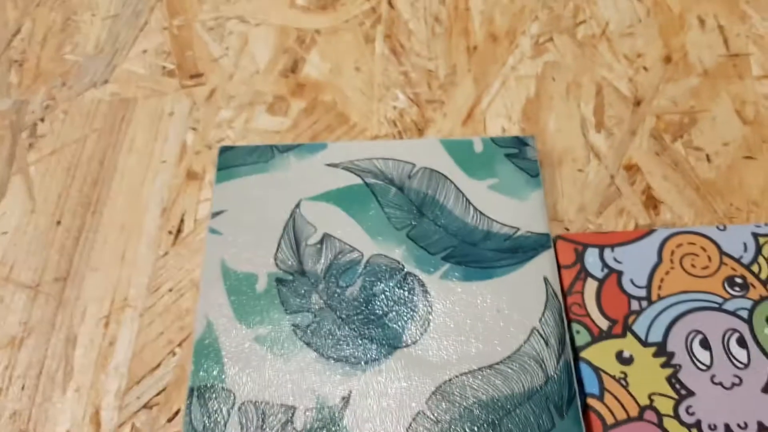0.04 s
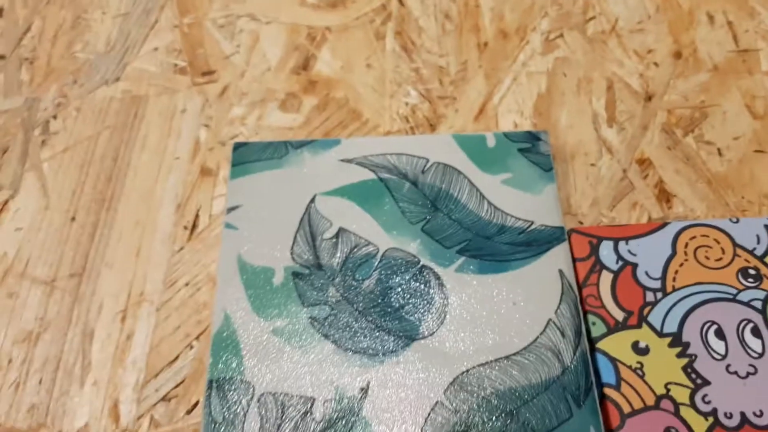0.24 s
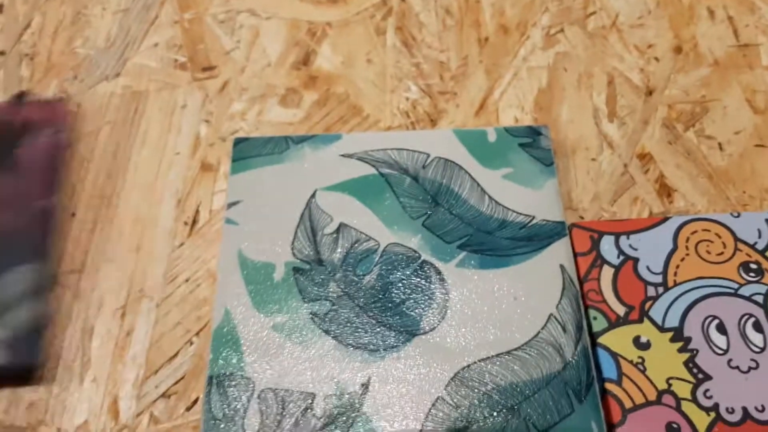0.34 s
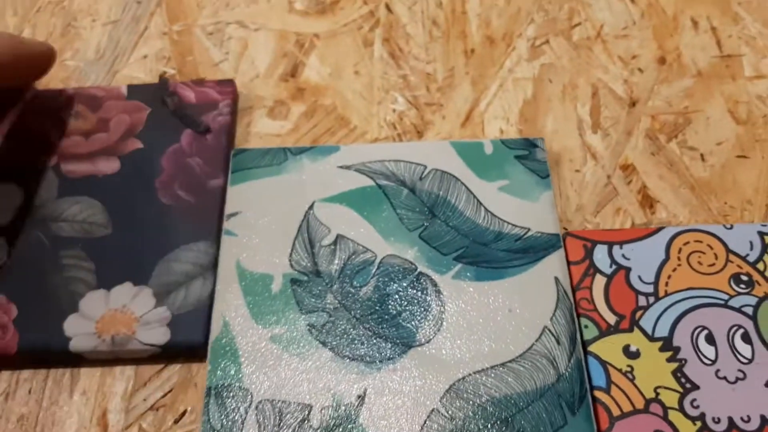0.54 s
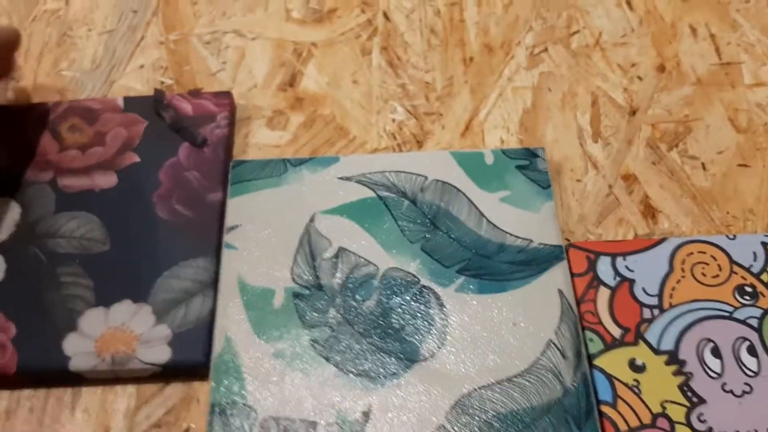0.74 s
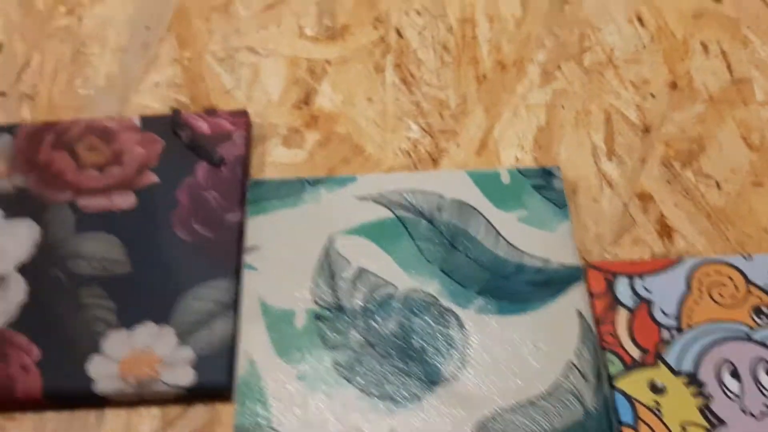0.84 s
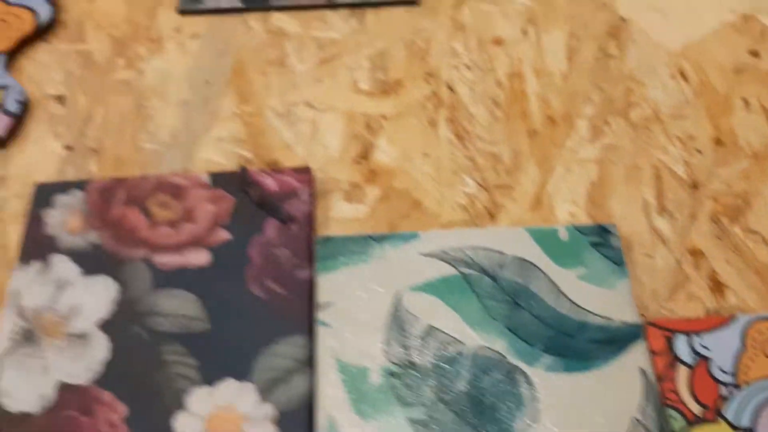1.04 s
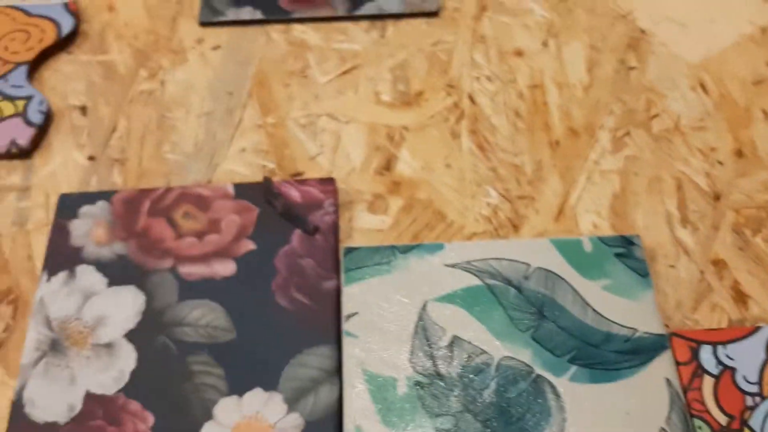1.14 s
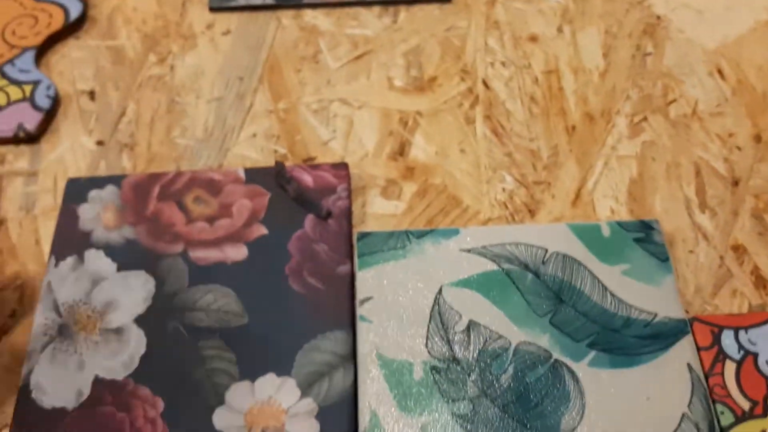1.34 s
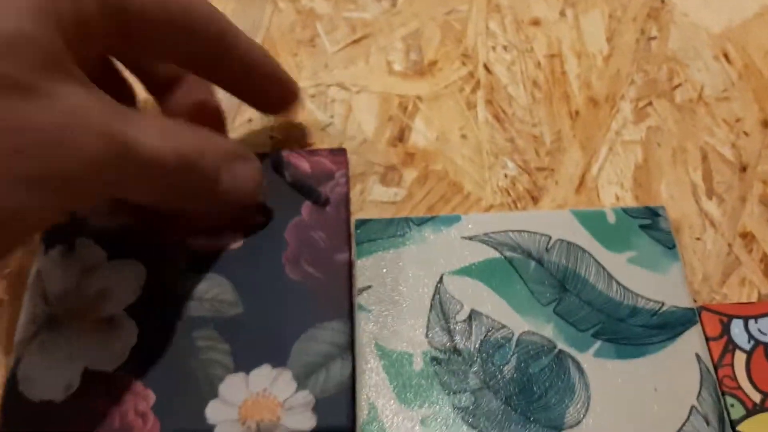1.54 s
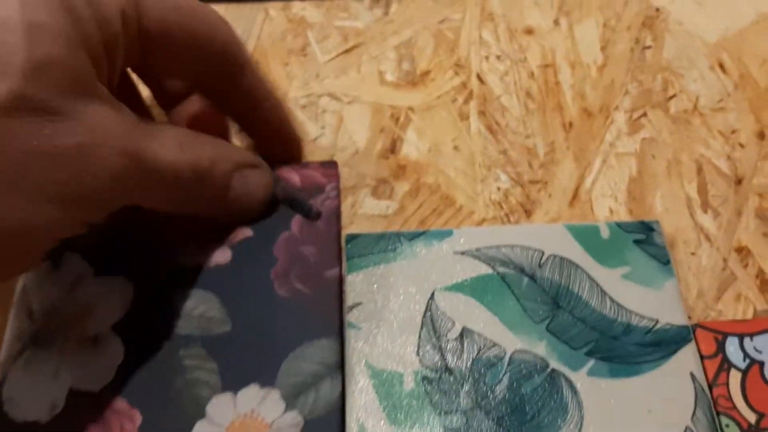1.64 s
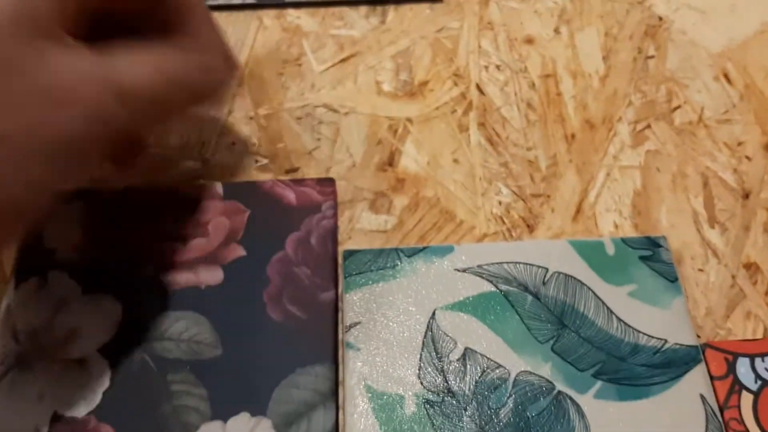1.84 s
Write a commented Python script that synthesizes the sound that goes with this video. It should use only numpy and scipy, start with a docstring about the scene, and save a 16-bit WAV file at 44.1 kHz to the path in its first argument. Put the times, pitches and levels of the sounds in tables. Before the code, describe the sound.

A ceramic tile scrapes across a chipboard table, making the board rumble, and clacks against another tile. A low hum fades in the bare room, then a sleeve rustles softly nearby and fingers nudge the tile with faint squeaks.

```python
"""Tile pushed across a table

In a bare room a ceramic tile hisses over the grain of a chipboard table, judders over the chips so that
the board rumbles, and clacks against the next tile. A low drone lingers. Then a sleeve rustles softly,
and fingers nudge the tile, which whispers and squeaks faintly."""
import sys
import numpy as np
from scipy import signal
from scipy.fft import rfft, irfft, next_fast_len
from scipy.io import wavfile
from scipy.ndimage import uniform_filter1d

SR = 44100
rng = np.random.default_rng(int(sys.argv[2]) if len(sys.argv) > 2 else 0)


def materialize(psi):
    """Save the field psi as 16-bit PCM at rate SR to the path in sys.argv[1].

    A 1-D psi becomes a single channel; in a 2-D psi each row is a channel.
    """
    bounded = np.clip(np.atleast_2d(psi).T, -1, 1)
    quanta = np.round(bounded * 32767).astype(np.int16)
    wavfile.write(sys.argv[1], SR, quanta)


N = 83790
TIME = np.arange(N) / SR
FFT_SIZE = next_fast_len(N + SR, real=True)
FREQS = np.maximum(np.fft.rfftfreq(FFT_SIZE, 1 / SR), 1)

# Pressure and speed of the slide. Each row: time in seconds, scrape gain in dB, rumble gain in dB.
SLIDE = [(.14, -98.5, -76), (.16, -70, -56), (.174, -68, -43), (.2, -61.5, -53.5), (.207, -50.5, -38),
         (.24, -41.5, -32.5), (.33, -36, -26), (.41, -36.5, -25), (.45, -40.5, -28), (.487, -44.5, -33),
         (.535, -60.5, -34), (.565, -61, -54), (.65, -69.5, -51), (.86, -77, -55.5)]
# The late, light push. Each row: time in seconds, hiss gain in dB, rumble gain in dB.
NUDGE = [(1.5, -59.5, -100), (1.58, -67, -71.5), (1.66, -61, -68), (1.712, -51, -70), (1.73, -57.5, -48),
         (1.765, -61.5, -65.5), (1.82, -64.5, -92), (1.85, -71.5, -101)]
# Kicks to the board. Each row: time in seconds, peak gain in dB, pitch in Hz.
CHIP_CATCHES = [(0.1736, -30.5, 333), (0.219, -26.5, 298), (.2610, -25, 390), (0.28, -22.5, 355),
                (0.2956, -17.5, 419), (0.31, -27.5, 385), (0.325, -23.5, 335), (0.34, -15, 333),
                (0.3536, -17.5, 500), (0.3659, -10.5, 490), (0.3778, -19, 240), (0.3857, -14.5, 450),
                (0.402, -9.5, 554), (0.4102, -18.5, 445), (.4140, -30.5, 550), (.4233, -16.5, 270),
                (0.4295, -18, 394.6), (.4500, -17, 358), (0.53, -24.5, 222), (.545, -26.5, 303.7)]  # the tile catches on a chip
SOFT_THUDS = [(.014, -55, 346), (1.568, -57, 121), (1.605, -52.5, 201), (1.7375, -54.5, 397)]  # a faint opening thud from the board, then fingers set down on the tile
# Short accents. Each row: time of the peak in seconds, gain in dB.
GRIT_HITS = [(.209, -43), (.238, -37), (.2605, -34), (.2775, -28), (.3165, -28), (.3215, -26.5),
             (.3665, -28), (.542, -48), (.5975, -50.5)]  # harder grit under the tile
SQUEAK_SPURTS = [(1.596, -67.5), (1.634, -68), (1.670, -63.5), (1.699, -61.5), (1.736, -59.5), (1.772, -61),
                 (1.793, -64), (1.817, -62.5)]  # the rubbing sticks and slips
# Envelopes of the quiet layers. Each row: time in seconds, gain in dB.
FINGER_ENVELOPE = [(1.49, -83.5), (1.56, -67.5), (1.61, -62.5), (1.68, -66.5), (1.74, -65), (1.83, -92)]
SLEEVE_ENVELOPE = [(0.86, -66.5), (0.896, -62.5), (0.962, -57), (1.212, -62), (1.318, -57), (1.506, -59.5),
                   (1.646, -65.5), (1.66, -64)]
DRONE_ENVELOPE = [(.52, -42.5), (.66, -49), (.86, -61.5), (1.01, -64), (1.05, -83)]
# Tone colours of the noises. Each row: frequency in Hz, relative level in dB.
THUD_COLOUR = [(25, -27), (50, -20.5), (75, -2.5), (100, -8), (135, 2.5), (180, -8), (240, 1), (300, 5),
               (420, 4.5), (700, -7), (1000, -18), (1400, -6.5), (2500, -21), (6000, -48)]
SCRAPE_COLOUR = [(600, -13), (1000, -10.5), (1350, -11.5), (1700, -4.5), (2200, -4.5), (3300, -12),
                 (4200, -8.5), (6200, -13), (7700, -8), (8600, -23), (10500, -19.5), (12000, -11.5),
                 (14500, -11), (15800, -15)]
CRACK_COLOUR = [(500, -18), (1200, -4), (1800, 4.5), (2600, 11), (3500, 0), (4400, -8), (5800, -14),
                (7600, 9), (9200, -48), (14000, -15)]
NUDGE_COLOUR = [(1000, -24), (1600, -3.5), (3200, -11), (4500, -1), (6000, -8), (7500, 2.5), (8800, -14.5),
                (12000, -1), (15500, -3.5)]
FINGER_COLOUR = [(25, -5), (65, 9), (130, -6), (320, -7), (600, -31), (2000, -62)]
SLEEVE_COLOUR = [(300, -43), (800, -19.5), (1100, -9.5), (1320, 2), (1600, 4), (2000, -1.5), (2700, -2),
                 (3200, -5), (4200, -0.5), (6000, -7.5), (7600, -7.5), (8600, -29.5), (10000, -15.5),
                 (12000, -12), (15500, -20)]
ROOM_TONE_COLOUR = [(25, -11.5), (60, 0.5), (130, -10.5), (300, -12.5), (600, -19.5), (1100, -20),
                    (1600, -18), (2200, -17), (3000, -27.5), (7000, -30), (9000, -37), (15800, -26.5)]
# Resonances. Each row: pitch in Hz, relative level in dB, seconds to die away by 60 dB.
BOARD_MODES = [(73, -28, .35), (131, -26, .25), (202, -28, .2), (235, -27, .2), (271, -21, .2),
               (311, -26, .2), (334, -23, .25), (391, -22, .2), (462, -31, .12), (515, -30, .12),
               (580, -30, .12), (1290, -22, .07)]
TILE_MODES = [(1233, -21, .06), (1660, -8.5, .024), (1850, -12, .018), (2036, -17, .07), (2424, -17, .05),
              (2735, -22, .055), (2864, -40, .6), (2880, -21, .05), (3030, -21, .055), (4185, -14, .028),
              (4354, -9, .028), (4490, -9, .01), (7360, -18, .055), (8090, -23, .04), (11940, -30, .03)]
DRONE_MODES = [(225, -2.5, 0.34), (269.4, -1, .2), (338, 1, 0.11)]
# Partials of the rubbed glaze. Each row: pitch in Hz, relative level in dB, pitch waver in Hz.
GLAZE_PARTIALS = [(4231, 5.5, 45), (7208, 0.5, 80), (7477, -5, 120), (11978, 2, 35), (13119, -2.5, 50),
                  (14551, 0, 80)]
# The bare room's reverb. Each row: frequency in Hz, seconds to die away by 60 dB, gain in dB.
REVERB_BANDS = [(60, 0.27, -14), (128.2, 0.99, -13), (285, 0.63, -4.5), (530, 0.83, -14), (976, 1, -3.5),
                (1940, 1, -8), (2874, .85, -5.5), (3500, 1, -8.5), (4560, 0.57, -15), (5860, 0.56, -10.5),
                (8850, 0.13, -20), (15000, .5, -16.5)]
# Stereo width. Each row: frequency in Hz, left-right likeness from 0 (wide) to 1 (mono).
NEAR_LIKENESS = [(300, 0.3), (700, 0.87), (1300, 0.95), (2500, 0), (5000, 0), (15000, 0.35)]
SLEEVE_LIKENESS = [(300, 0.42), (1400, 0.039), (3000, .15), (7000, 0.22)]
ROOM_LIKENESS = [(60, 0.77), (250, 0.78), (500, 0.37), (1000, 0.23), (4000, 0.31)]
# Stereo lean. Each row: frequency in Hz, left minus right in dB.
TABLE_BALANCE = [(60, 0), (270, -1.5), (450, -1), (700, -3.5), (1600, -7), (2200, -6), (3500, -5.5),
                 (4300, -4), (6000, -5), (9000, -1), (14000, -7.5)]
ROOM_BALANCE = [(60, -11.5), (300, -2.5), (600, -5.5), (1600, -9), (6000, -6), (12000, -5.5)]


def amp(db):
    return 10 ** (np.asarray(db) / 20)


def unit_rms(x):
    return x / np.sqrt(np.mean(x ** 2) + 1e-20)


def steady(x, samples):
    """Ride the gain so that the running level stays even."""
    return x / np.sqrt(uniform_filter1d(x ** 2, size=samples) + 1e-9)


def at_hz(rows, hz, column=1):
    points = np.array(rows)
    return np.interp(np.log(hz), np.log(points[:, 0]), points[:, column])


def envelope(rows, column=1, fade_s=.018):
    """Gain along a dB curve, fading out beyond its ends."""
    points = np.array(rows)
    outside_s = np.maximum(points[0, 0] - TIME, 0) + np.maximum(TIME - points[-1, 0], 0)
    return amp(np.interp(TIME, points[:, 0], points[:, column])) * np.exp(-(outside_s / fade_s) ** 2)


def convolve(x, response):
    return irfft(rfft(x, FFT_SIZE) * rfft(response, FFT_SIZE), FFT_SIZE)[..., :N]


def pulse(colour):
    """A minimum-phase click of the given colour, peak 1."""
    cepstrum = irfft(np.log(amp(at_hz(colour, FREQS))), FFT_SIZE)
    cepstrum[1:FFT_SIZE // 2] *= 2
    cepstrum[FFT_SIZE // 2 + 1:] = 0
    click = irfft(np.exp(rfft(cepstrum)), FFT_SIZE)[:N]
    return click / np.abs(click).max()


def ring(modes):
    """Decaying sines of a struck body."""
    return sum(amp(db - 60 * TIME / t60) * np.sin(2 * np.pi * hz * TIME) for hz, db, t60 in modes)


def noise(colour, likeness):
    white = widen(rng.standard_normal((2, N)), likeness)
    return unit_rms(convolve(white, pulse(colour)))


def grains(per_s, spread_db):
    """Random clicks of uneven size."""
    sizes = amp(spread_db * np.minimum(rng.exponential(1, N), 5))
    return (rng.random(N) < per_s / SR) * sizes * rng.choice([-1, 1], N)


def flicker(per_s):
    return np.interp(TIME * per_s, np.arange(N), rng.standard_normal(N))


def delayed(x, seconds):
    shift = int(seconds * SR)
    return np.concatenate([np.zeros_like(x[..., :shift]), x[..., :N - shift]], axis=-1)


def lag_right(pair, seconds):
    return np.array([pair[0], np.interp(TIME - seconds, TIME, pair[1])])


def pan(left_db):
    gains = amp([[left_db / 2], [-left_db / 2]])
    return gains / gains.mean()


def balance(x, rows):
    """Pan each frequency to its own place."""
    half_db = at_hz(rows, FREQS) / 2
    gains = amp([half_db, -half_db])
    return irfft(rfft(x, FFT_SIZE) * gains / gains.mean(axis=0), FFT_SIZE)[:, :N]


def widen(pair, likeness):
    """Two unrelated signals become left and right, alike as given per frequency."""
    alike = np.clip(at_hz(likeness, FREQS), -.99, .99)
    mid, side = rfft(pair, FFT_SIZE)
    stereo = np.sqrt(1 + alike) * mid + np.sqrt(1 - alike) * side * [[1], [-1]]
    return irfft(stereo, FFT_SIZE)[:, :N] / np.sqrt(2)


def kick(at_s, hz):
    """The board dips and springs back."""
    phase_squared = (np.pi * hz * (TIME - at_s)) ** 2
    return (1 - 2 * phase_squared) * np.exp(-phase_squared)


def board(judder_top_hz=1460, bass_hz=146.4, boom_threshold_db=-28.5):
    """The board thuds at each kick, rumbles under the smaller judders, and rings."""
    kicks = sum(amp(db) * kick(at_s, hz) for at_s, db, hz in CHIP_CATCHES + SOFT_THUDS)
    judders = convolve(grains(per_s=520, spread_db=1.5), pulse(THUD_COLOUR))
    judders = signal.sosfilt(signal.butter(2, judder_top_hz, fs=SR, output="sos"), judders)
    judders = steady(judders, samples=900)
    force = envelope(SLIDE, column=2) + envelope(NUDGE, column=2)
    bass = signal.sosfiltfilt(signal.butter(2, bass_hz, fs=SR, output="sos"), judders)
    boom = np.clip((force / amp(boom_threshold_db)) ** 3, .12, 1.6)  # only a hard push booms fully
    judders += bass * (boom - 1)
    thuds = kicks + amp(-3) * judders * force
    ringing = amp(-32.5) * convolve(thuds, ring(BOARD_MODES))
    return (thuds + ringing) * pan(left_db=1)


def scrape(flicker_db=1.1, low_cut_hz=500):
    """The unglazed back of the tile rasps over wood fibres, flaring where it meets grit."""
    fibres = np.array([grains(per_s=8200, spread_db=3.5) for _ in range(2)])
    fibres = widen(fibres, NEAR_LIKENESS) * amp(flicker_db * flicker(170))
    rasp = convolve(fibres, pulse(SCRAPE_COLOUR))
    rasp = signal.sosfilt(signal.butter(2, low_cut_hz, "high", fs=SR, output="sos"), rasp)
    flares = sum(amp(db) * delayed(np.exp(-TIME / .0023), at_s) for at_s, db in GRIT_HITS)
    return unit_rms(rasp) * (amp(2.5) * envelope(SLIDE) + flares) * pan(left_db=1.5)


def clack(at_s=.4935, crack_decay_s=.0019):
    """Edge meets edge: a short crack and the damped ring of the tiles."""
    crack = amp(-7.5) * noise(CRACK_COLOUR, NEAR_LIKENESS) * np.exp(-TIME / crack_decay_s)
    blow = lag_right(crack + amp(-4) * ring(TILE_MODES), seconds=.0002)
    return amp(-11) * delayed(blow, at_s) * pan(left_db=-2.5)


def nudge():
    """A light push makes the tile whisper and squeak."""
    whisper = noise(NUDGE_COLOUR, NEAR_LIKENESS) * envelope(NUDGE)
    return (whisper + squeak()) * pan(left_db=.5)


def squeak(spurt_s=.011, flicker_db=2.5):
    """The glaze sings in stick-slip spurts; each partial wavers in pitch and strength."""
    tone = 0
    for hz, db, waver_hz in GLAZE_PARTIALS:
        phase = 2 * np.pi * np.cumsum(hz + waver_hz * flicker(400)) / SR
        strength = amp(db + flicker_db * flicker(90))
        stereo_drift = np.array([flicker(55), flicker(60)])
        tone = tone + strength * np.sin(phase + stereo_drift)
    spurts = sum(amp(db) * np.exp(-((TIME - at_s) / spurt_s) ** 2) for at_s, db in SQUEAK_SPURTS)
    return unit_rms(tone) * spurts


def fingers():
    """Fingertips rub dully on the tile."""
    return noise(FINGER_COLOUR, NEAR_LIKENESS) * envelope(FINGER_ENVELOPE) * pan(left_db=-5.5)


def sleeve():
    """Cloth brushes close by on the right as the arm moves."""
    cloth = amp(-.5) * noise(SLEEVE_COLOUR, SLEEVE_LIKENESS)
    return cloth * envelope(SLEEVE_ENVELOPE) * pan(left_db=-10.5)


def drone():
    """A soft low drone of resonant noise outlasts the slide."""
    hum = convolve(rng.standard_normal(N), ring(DRONE_MODES))
    return steady(hum, samples=2500) * envelope(DRONE_ENVELOPE)


def reverb(x, predelay_s=.006):
    """The room's diffuse echo dies at its own rate in each third-octave band."""
    wash = rfft(widen(rng.standard_normal((2, N)), ROOM_LIKENESS))
    hz = np.fft.rfftfreq(N, 1 / SR)
    edges_hz = 40 * 2 ** (np.arange(27) / 3)
    tail = 0
    for low, high in zip(edges_hz, edges_hz[1:]):
        centre = np.sqrt(low * high)
        band = irfft(wash * (hz >= low) * (hz < high), N)
        decay = amp(-60 * TIME / at_hz(REVERB_BANDS, centre))
        gain = amp(at_hz(REVERB_BANDS, centre, column=2)) / np.linalg.norm(decay)
        tail = tail + gain * band * decay
    return balance(convolve(x, delayed(tail, predelay_s)), ROOM_BALANCE)


def room_tone(whine_hz=1520):
    """A quiet bed of room noise with a thin whine."""
    whine = unit_rms(convolve(rng.standard_normal((2, N)), ring([(whine_hz, 0, .08)])))
    return amp(-72) * noise(ROOM_TONE_COLOUR, ROOM_LIKENESS) + amp(-76.5) * whine


def scene():
    """The action on the table feeds the reverb; sleeve, room tone and drone stay dry."""
    table = board() + scrape() + clack() + nudge() + fingers()
    direct = balance(lag_right(table, seconds=.00028), TABLE_BALANCE)  # reaches the left side first
    return direct + reverb(table) + sleeve() + room_tone() + drone()


def record(dry, cutoff_hz=15900):
    """A steep high cut takes off the very top."""
    rolloff = np.sqrt(1 + (FREQS / cutoff_hz) ** 300)
    return irfft(rfft(dry, FFT_SIZE) / rolloff, FFT_SIZE)[:, :N]


dry = scene()
out = record(dry)
materialize(out)
```